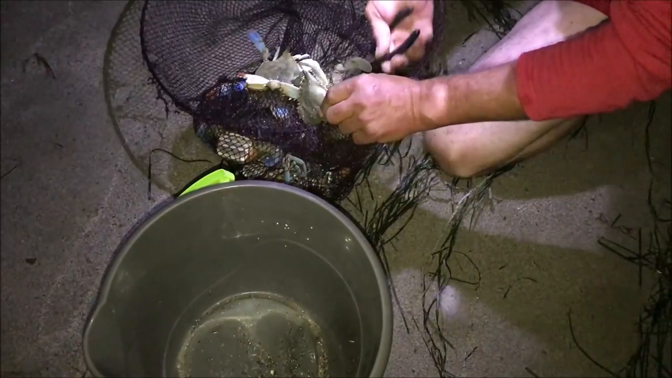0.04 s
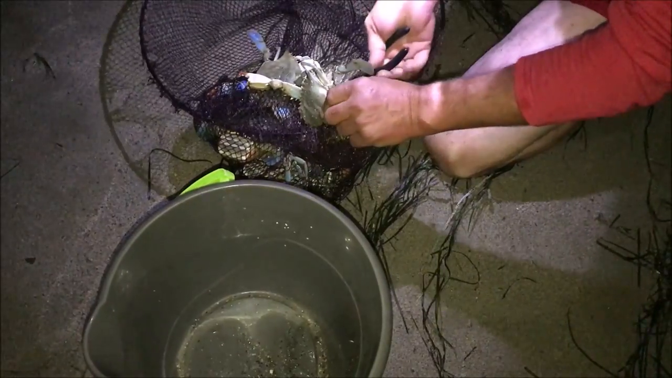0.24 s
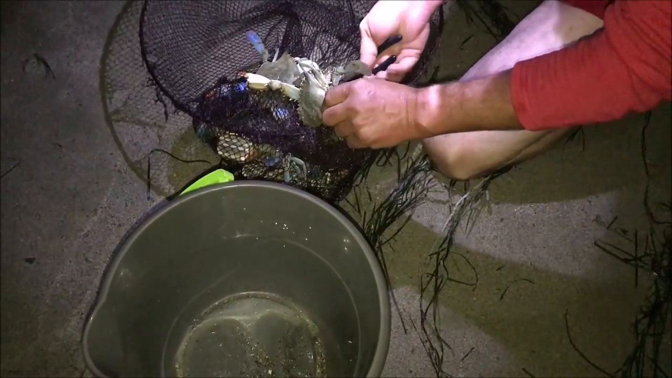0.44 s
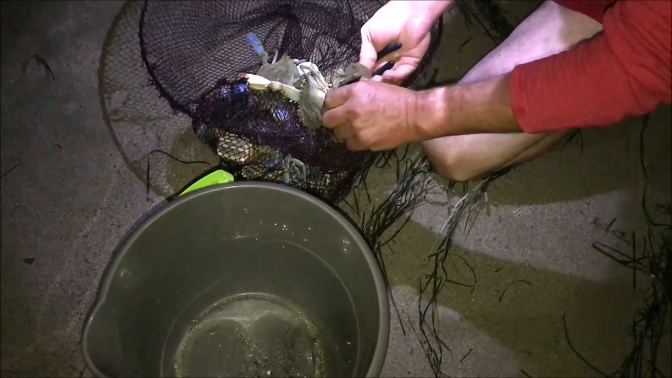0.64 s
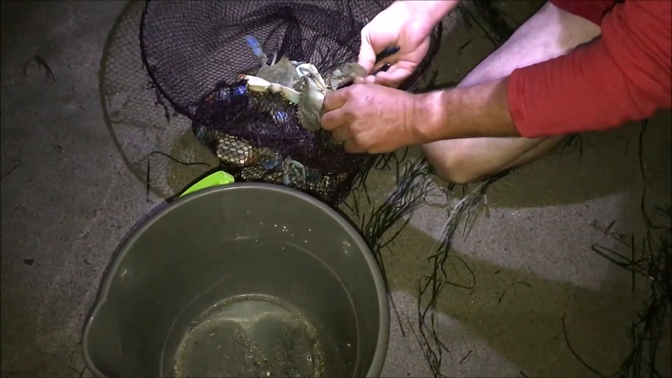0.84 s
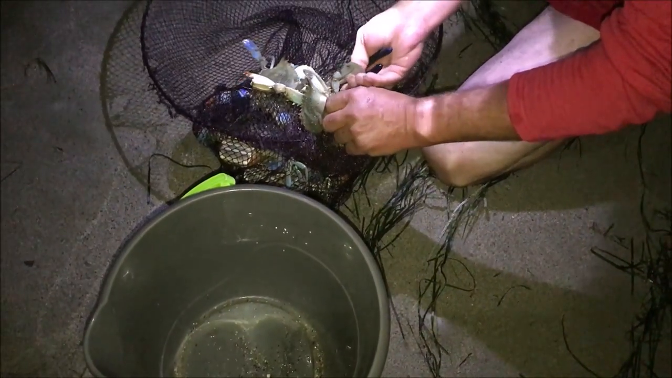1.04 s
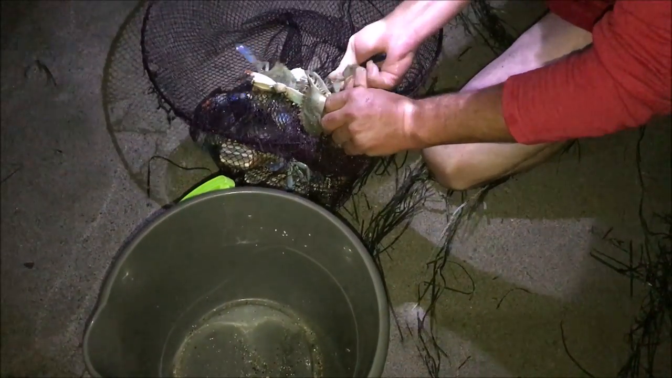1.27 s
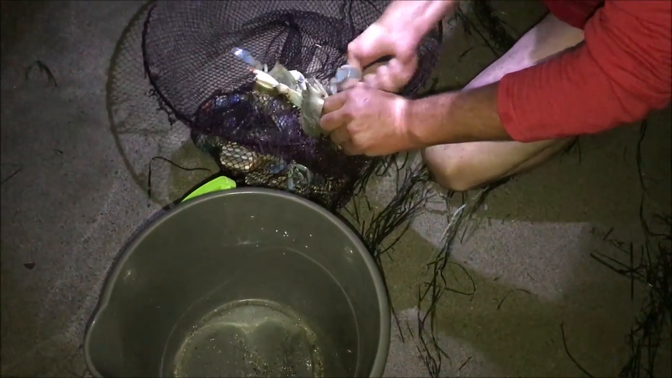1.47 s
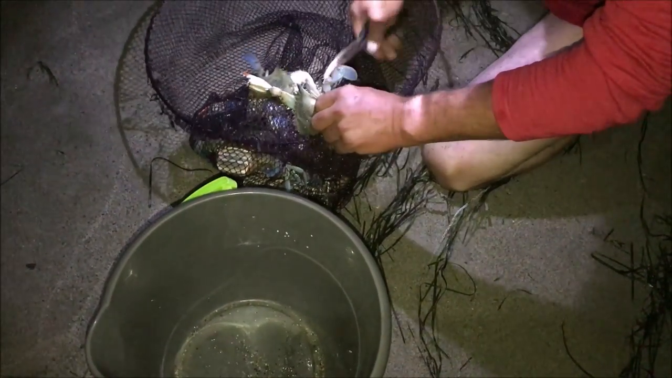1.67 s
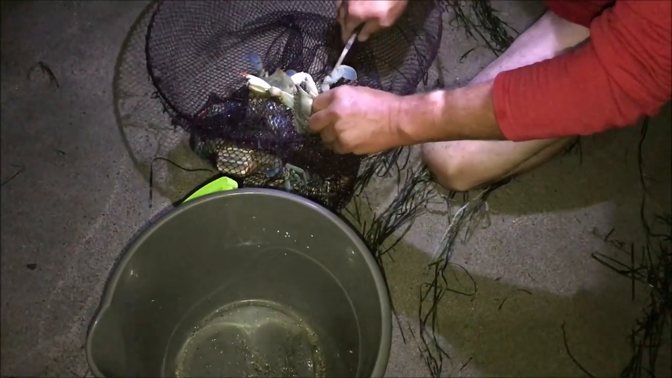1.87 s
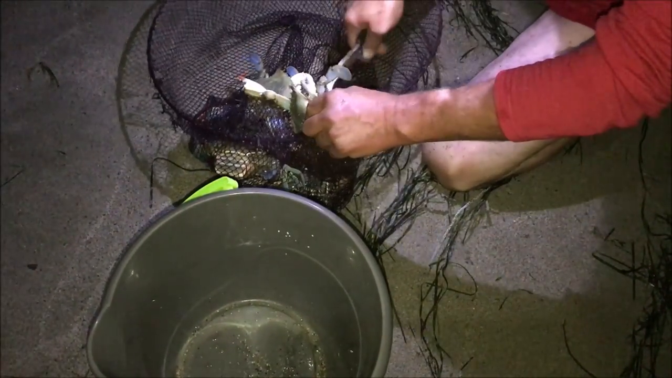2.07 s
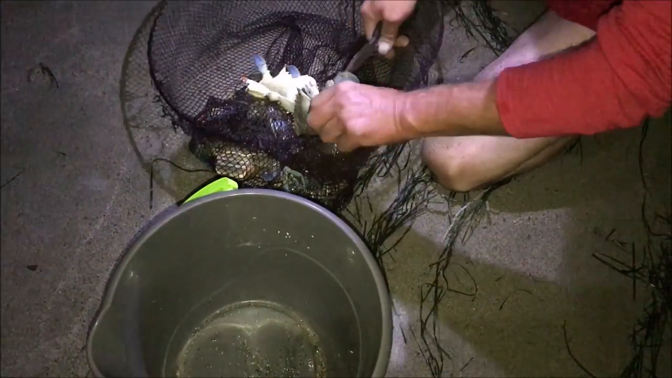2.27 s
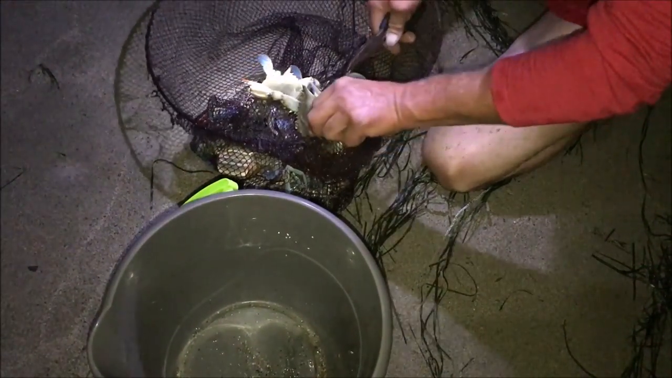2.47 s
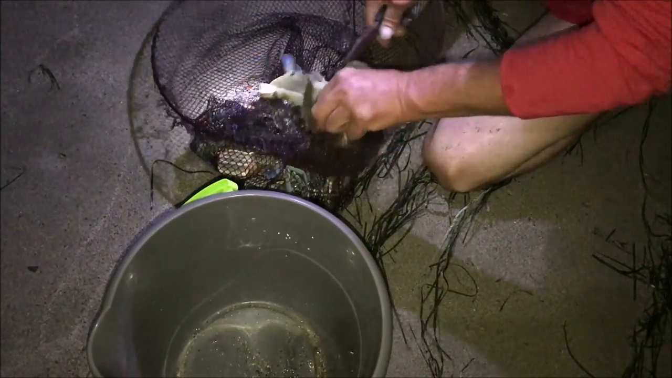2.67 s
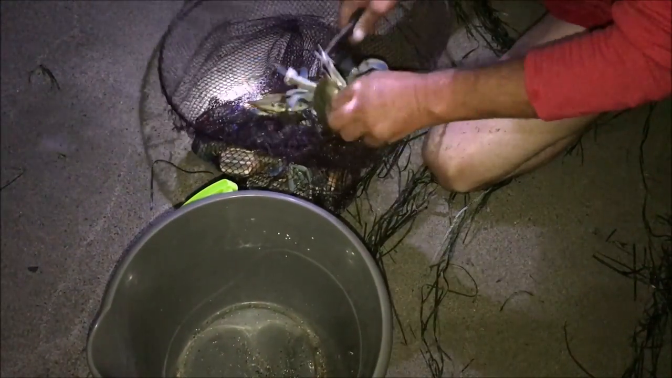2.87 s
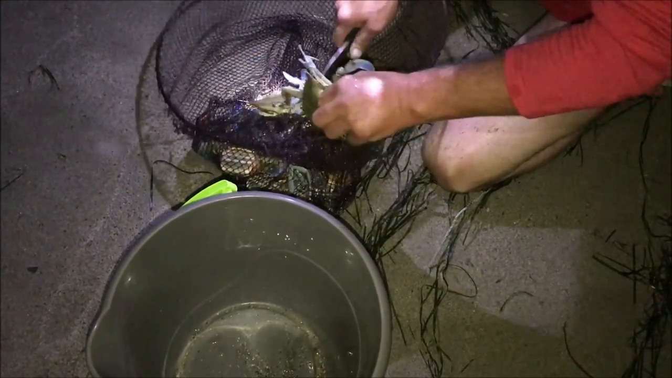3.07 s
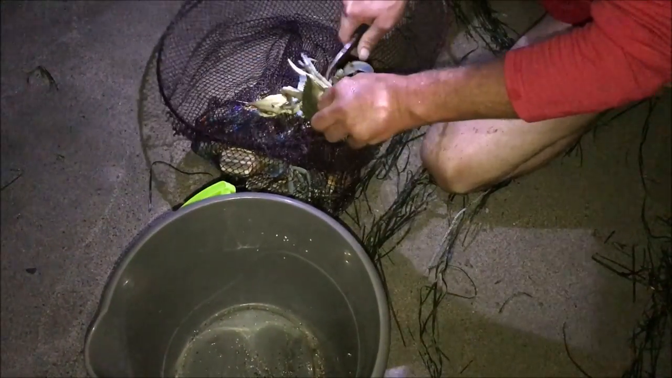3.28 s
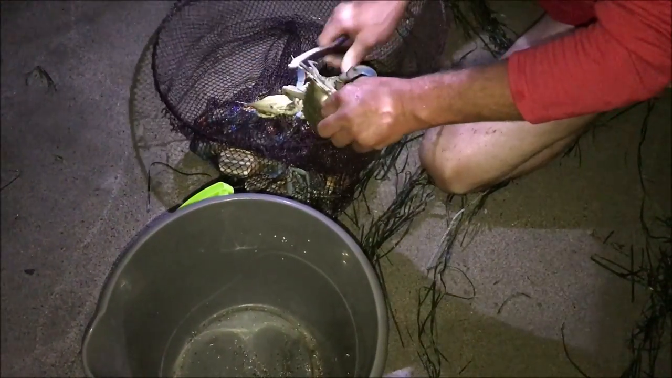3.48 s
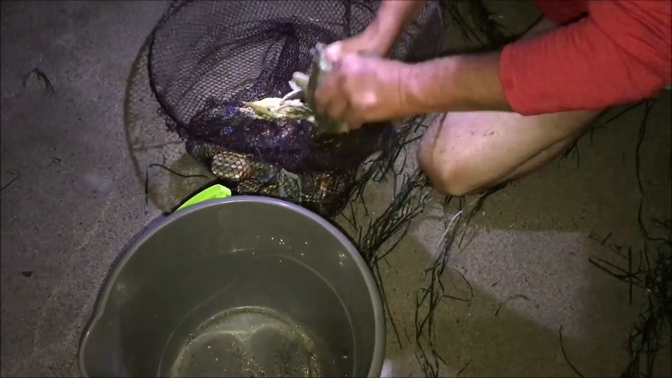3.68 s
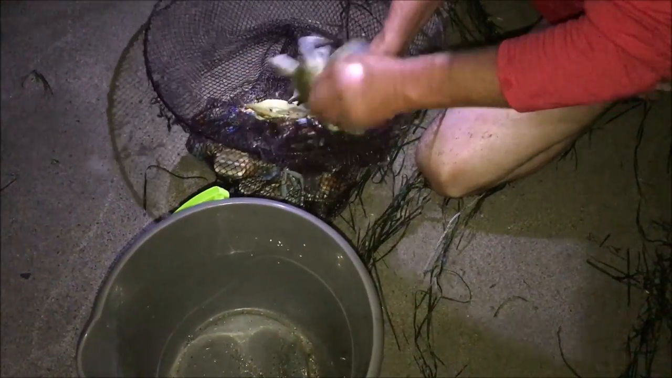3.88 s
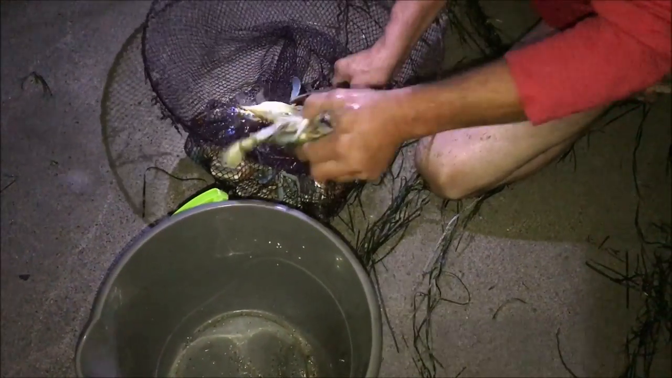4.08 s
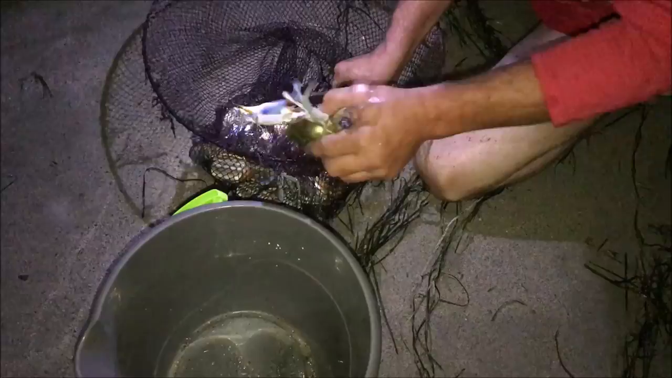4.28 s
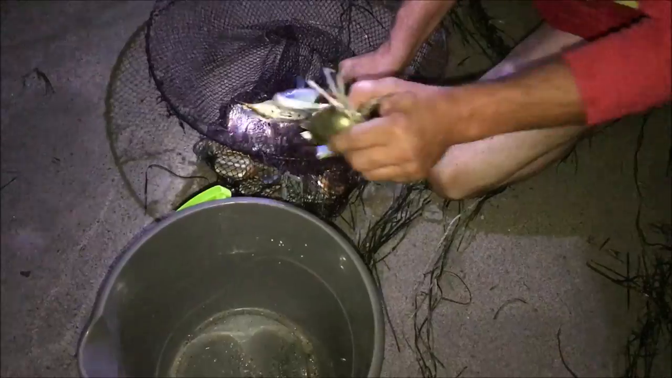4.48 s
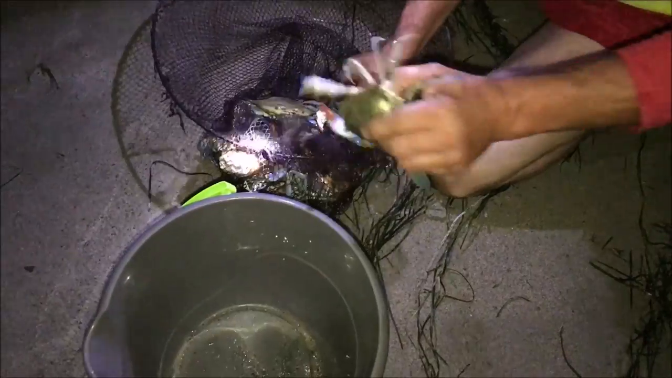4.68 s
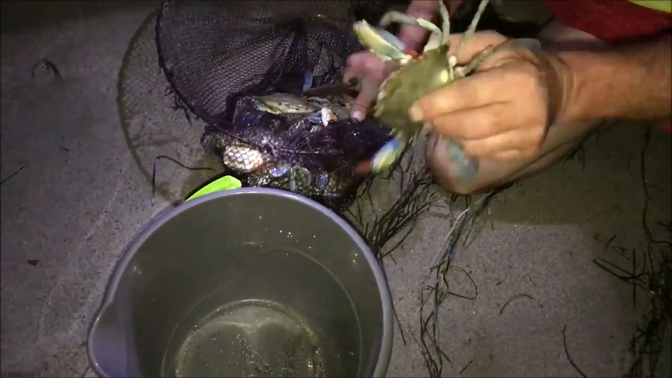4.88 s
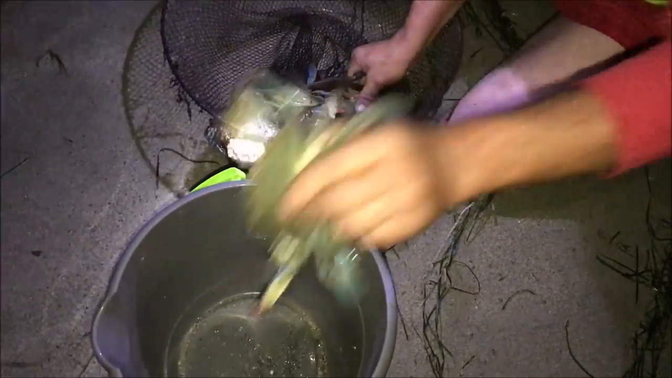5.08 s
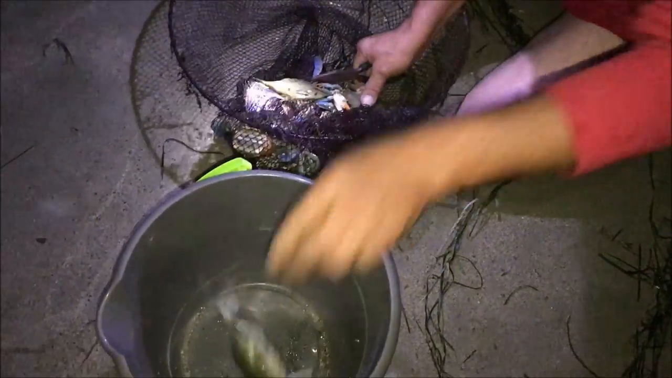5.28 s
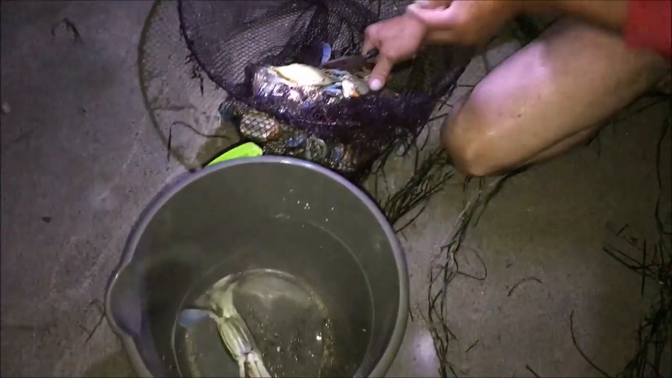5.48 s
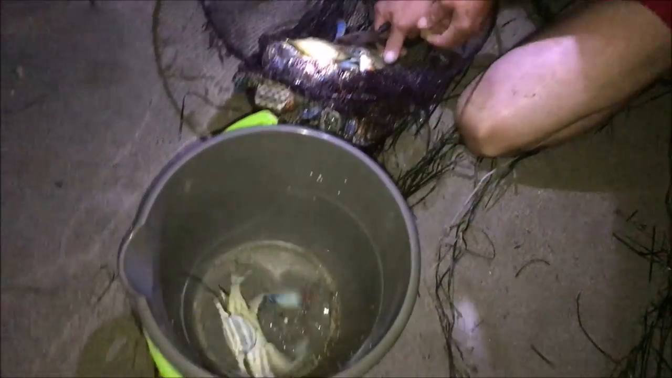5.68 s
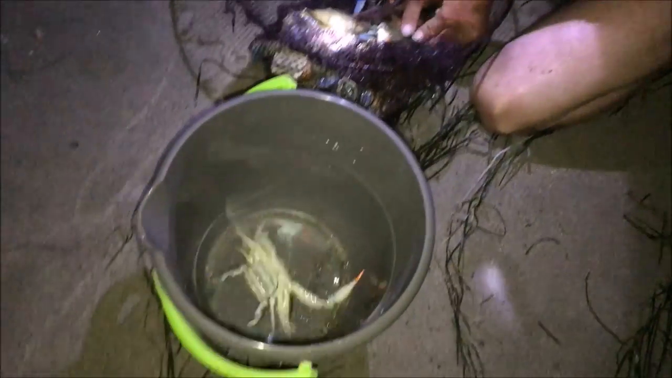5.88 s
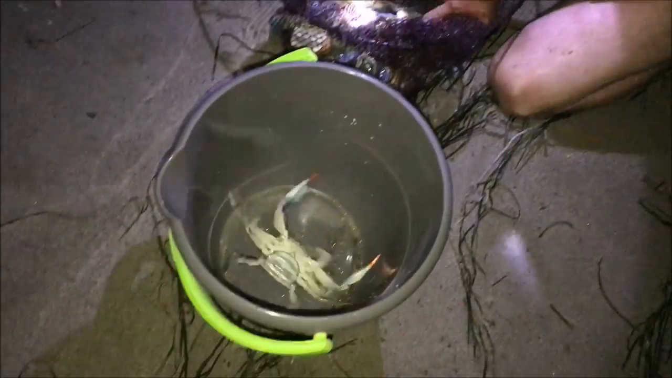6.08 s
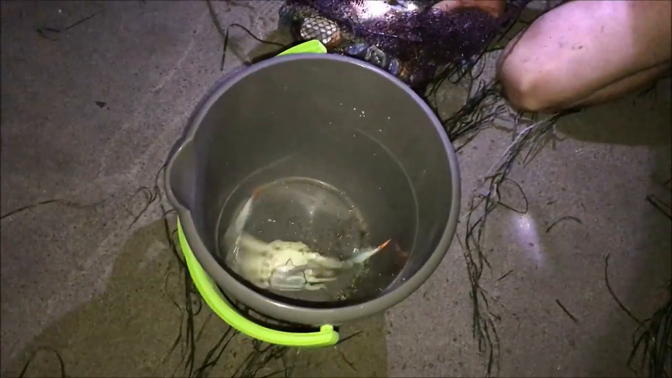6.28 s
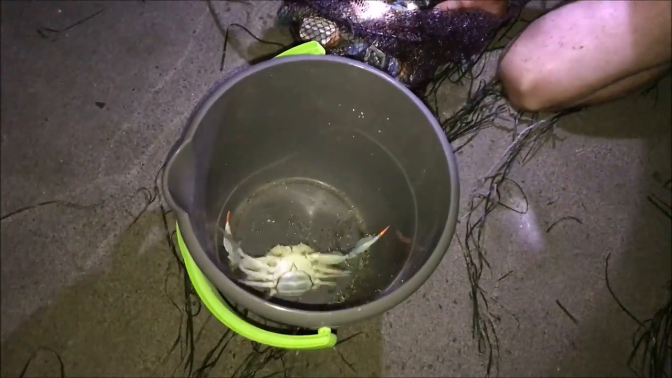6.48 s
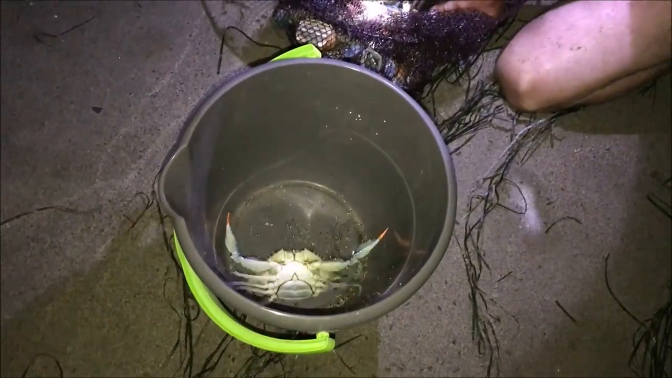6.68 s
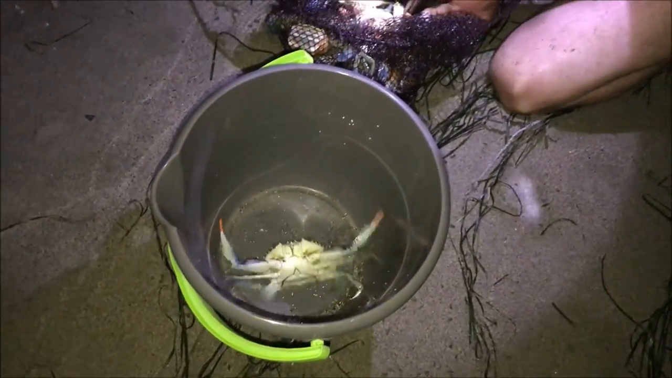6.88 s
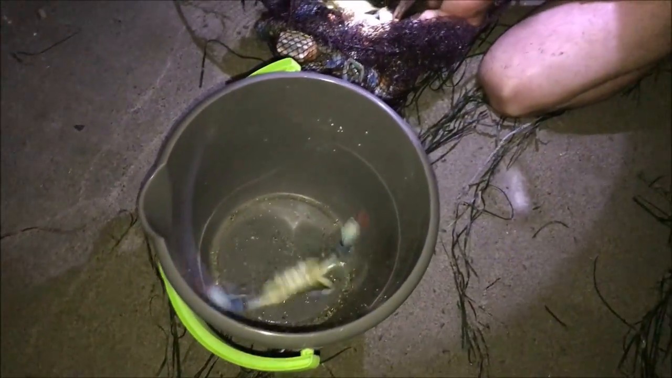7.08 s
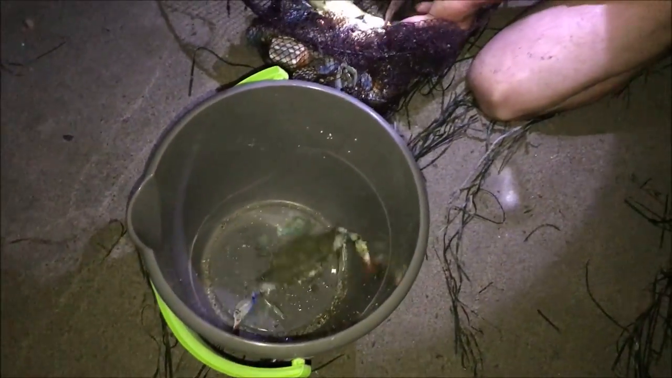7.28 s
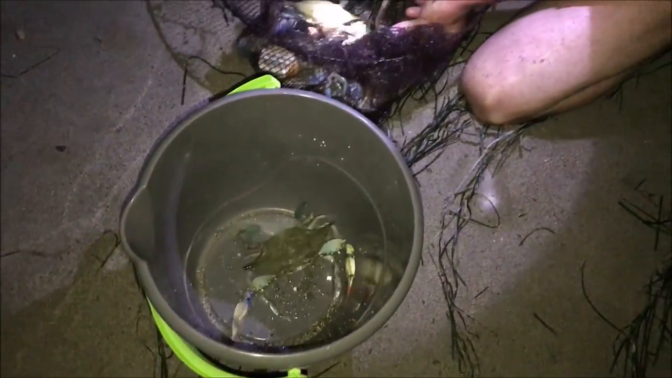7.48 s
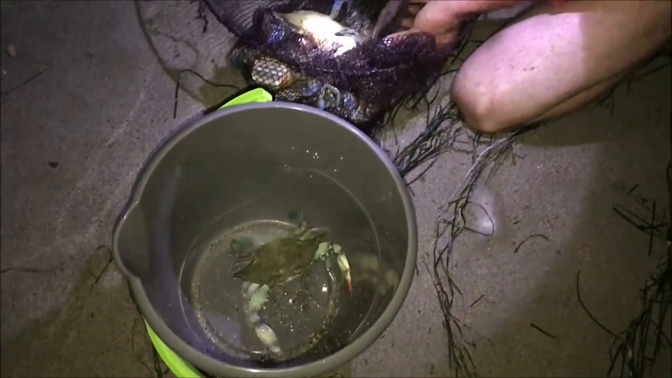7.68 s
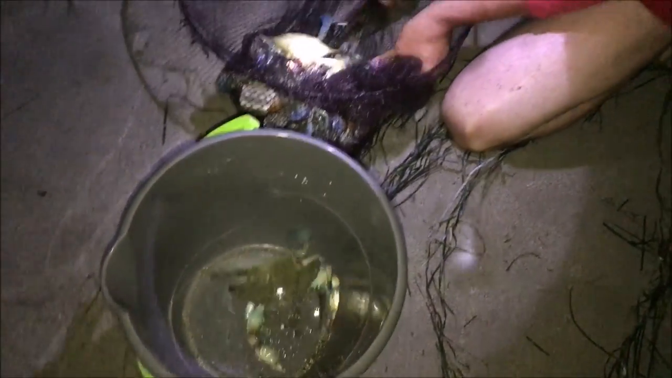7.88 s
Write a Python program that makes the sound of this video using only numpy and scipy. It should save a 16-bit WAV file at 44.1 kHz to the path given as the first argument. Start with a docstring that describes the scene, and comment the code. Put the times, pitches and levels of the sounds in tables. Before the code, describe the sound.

Small waves wash and gurgle at a night shore, two sharp snaps crack out, and a crab drops clattering into a plastic bucket and scrabbles.

```python
"""Crab in a bucket, night shore

Small waves run up and drain: noise and bubbles, with fizz, gurgles and low air gulps.
Behind them: filtered-noise far sea and wind, a far engine as three low gliding sine stretches, a thin hiss.
Sharp snaps and faint ticks, first as hands free the crab from a net, later in the bucket: short rings,
thumps and bright noise cracks.
In the plastic bucket legs and claws knock and scrabble: noisy contacts and slips ring decaying modes.
"""
import sys
import numpy as np
from scipy import signal
from scipy.fft import rfft, irfft
from scipy.io import wavfile
from scipy.ndimage import uniform_filter1d

SR = 44100
rng = np.random.default_rng(int(sys.argv[2]) if len(sys.argv) > 2 else 0)


def to_wav(sig):
    """Store sig (one row per channel, or 1-D mono) as 16-bit WAV at the path in sys.argv[1].

    Samples outside -1..1 are clipped; the rate is SR.
    """
    pcm = np.clip(np.atleast_2d(sig), -1, 1) * 32767
    pcm = np.round(pcm).astype(np.int16)
    wavfile.write(sys.argv[1], SR, pcm.T)  # frames by channels


N = 350151

# Far sea spectrum. Each row: frequency in Hz, relative density in dB per Hz.
SEA_SPECTRUM = [(53, -19), (90, -1.5), (146, -5), (282, -14.5), (480, -10), (600, -1.5), (700, -2.5),
                (822, -17), (1200, -7), (2090, -11.5), (3000, -35), (5500, -90)]
SEA_DB = -59.5
# Wind spectrum. Each row: frequency in Hz, relative density in dB per Hz.
WIND_SPECTRUM = [(15, -30), (30, -9), (55, 6), (80, -1), (130, -31), (300, -70)]
# Gusts over the breeze. Each row: middle in seconds, peak in dB, length (two standard deviations) in seconds.
GUSTS = [(0.0, -58, .15), (.55, -66, .15), (1.12, -61, .05), (2.1, -63, .2), (2.35, -59, 0.055),
         (4.4, -56, .06), (4.9, -65, .06), (5.25, -65, .1)]
BREEZE_DB = -69
# Far engine, one list per stretch. Each row: time in seconds, pitch in Hz, level in dB.
ENGINE_STRETCHES = [
    [(0, 99.3, -65.5), (.8, 102.4, -62.5), (.92, 102, -81)],
    [(1.15, 97, -80), (1.45, 109.5, -65.5), (1.7, 122.7, -67.5), (2.15, 127, -78)],
    [(1.9, 92, -82), (2.25, 99, -69), (2.5, 102.5, -71), (2.8, 100, -62), (3.1, 94, -78)],
]
# High hiss, perhaps an insect. Each row: time in seconds, centre in Hz, level in dB.
HISS = [(2.25, 14100, -82.5), (2.4, 14200, -62), (2.65, 14200, -60), (2.9, 14600, -62), (3.05, 14700, -80)]

# Waves. Each row: time in seconds, wash level in dB, foam fizz level in dB, gurgle level in dB,
# pitch of the hollow in Hz.
WAVES = [(0.0, -49, -52.5, -61.5, 260), (0.55, -51.5, -54, -60.5, 250), (1.07, -58.5, -55.5, -63, 225),
         (1.5, -59.5, -55, -68, 316), (1.72, -55, -56, -61, 230), (2.29, -61, -61.5, -65.5, 252),
         (2.46, -55, -54, -63, 340), (2.64, -45.5, -54, -53.5, 300), (2.92, -43.5, -53, -43.5, 357),
         (3.2, -43.5, -55, -57, 403), (3.61, -38, -50, -51.5, 360), (3.85, -40, -51, -50, 342),
         (4.13, -38, -44.5, -52.5, 246), (4.45, -41, -51.5, -50, 260), (4.83, -46, -51, -56, 226),
         (5.35, -48, -54, -52.5, 240), (5.6, -57.5, -47.5, -70, 250), (6.7, -57.5, -61.5, -66, 255),
         (7.3, -46, -53, -53, 250), (7.65, -53, -58.5, -59, 261), (7.94, -39.5, -49, -50, 254)]
# Wash spectrum. Each row: frequency in Hz, relative density in dB per Hz.
WASH_SPECTRUM = [(250, -37), (420, -8), (540, -8), (650, -1.5), (820, -3), (1100, 0), (1700, -2.5),
                 (3500, -6.5), (5000, -10), (9000, -16.5), (16000, -40)]
# Foam fizz spectrum. Each row: frequency in Hz, relative density in dB per Hz.
FIZZ_SPECTRUM = [(880, -55), (1500, -10), (2210, -30), (2390, -9), (2610, -15), (3030, -3), (3960, -9),
                 (5600, -5), (7460, -6.5), (14300, -6), (16000, -6.5)]
# Air trapped under a wave. Each row: start in seconds, peak in dB, pitch in Hz, t60 in seconds.
GULPS = [(2.622, -42, 346, 0.081), (4.09, -36, 223, 0.095), (4.3, -38, 289, 0.054),
         (5.155, -37, 168.5, 0.12)]

# Snaps and faint ticks, at the net and later in the bucket. Each row: start in seconds, ring peak in dB,
# pitch in Hz, thump in dB re ring, crack in dB re ring, t60 in seconds.
SNAPS = [(0.0254, -44, 3000, -24, 25, 0.018), (0.0467, -42, 1940, -5, 10, 0.015),
         (1.473, -36, 3000, -30, 11, .01), (1.477, -2.5, 2980, -45, 0.5, 0.0098),
         (1.4778, -5, 2220, -14.5, -23, 0.0085), (1.4822, -25, 2930, -16, 2, .015),
         (1.489, -35, 1570, -15, -7, 0.017), (1.5, -38, 2260, -18, 8, 0.02),
         (1.5872, -30, 2280, -31, -10, 0.013), (1.688, -44.5, 1390, -21, 9, 0.015),
         (1.791, -27.5, 2250, -34, 4.5, 0.019), (1.7988, -41, 1890, -17, 12.5, 0.019),
         (1.89, -33, 1630, -30, -11, 0.0061), (2.29, -45, 2600, -20, 0, .012),
         (2.35, -45.5, 2940, -4, 10.5, 0.013), (2.428, -38.5, 1480, -27, 0, 0.023),
         (2.489, -38.5, 1850, -5, -13, 0.015), (3.1742, -34, 1530, -29, -19, 0.015),
         (4.8716, -31.5, 1860, -40, -19, 0.015), (4.9947, -35.5, 1990, -31, 9, 0.015),
         (7.5139, -3, 2495, -58, 1, 0.015), (7.5152, -21.5, 2400, -16, 16.5, 0.013),
         (7.788, -13, 3120, -30, -12, 0.0051)]
# Modes of a snap's ring. Each row: factor on the snap's pitch, level in dB.
SNAP_MODES = [(0.958, 27), (4.1, -24), (0.656, -22), (5.2, -28)]

# Bucket floor and air column. Each row: frequency in Hz, level in dB, t60 in seconds.
BOTTOM_MODES = [(67, -26, .09), (107, -22, 0.21), (189, -13, 0.17), (257, 4.5, 0.041), (310, 9.5, 0.052),
                (420, -9, 0.024)]
# Bucket wall. Each row: frequency in Hz, level in dB, t60 in seconds.
WALL_MODES = [(677, -19.5, 0.054), (767, -13.5, 0.029), (904, -8.5, 0.059), (1025, -10.5, 0.058),
              (1145, 3.5, 0.022), (1410, 2, 0.013), (1650, 4, 0.015), (1796, -3.5, 0.034), (2227, 9, 0.006),
              (2720, 3, 0.01), (3360, -4.5, 0.014), (3550, -28, 0.0092), (4060, 2, 0.006),
              (4500, -12, 0.0085)]
# Hard claw tip. Each row: frequency in Hz, level in dB, t60 in seconds (ring() floors it at 0.003).
CLAW_MODES = [(2480, -6, 0.0057), (3070, 0, 0.0029), (3970, -3, 0.002), (5600, -9.5, 0.0017)]
# Bright edge of a hard contact. Each row: frequency in Hz, relative density in dB per Hz.
TICK_SPECTRUM = [(1470, -82), (2500, -22), (3230, -3), (4020, -1.5), (5190, -3), (7770, -4.5), (8330, -1),
                 (9360, -6), (13100, -5), (16000, -11.5)]
# Struggling, legs dragging on plastic. Each row: start in seconds, length in seconds, wall scrape in dB,
# push on the bottom in dB, grit in dB.
BOUTS = [(5.407, 0.086, -39, -42, -43), (5.674, 0.12, -43, -51, -48.5), (5.801, 0.089, -38, -40, -43),
         (5.89, 0.081, -40.5, -43.5, -45.5), (5.977, .2, -48, -58, -58), (6.183, .16, -43.5, -48.5, -48),
         (6.352, 0.21, -41.5, -44.5, -47.5), (6.57, 0.5, -50.5, -55, -58), (7.036, 0.12, -47, -52, -51),
         (7.173, 0.12, -40, -51, -50.5), (7.31, 0.1, -45.5, -49.5, -57), (7.44, 0.11, -41.5, -53, -44.5),
         (7.578, 0.18, -47, -58.5, -58), (7.752, .25, -43.5, -54, -48)]
DRAG_EASE_S = 0.035
# Clear knocks on the bucket. Each row: start in seconds, wall peak in dB, thud, claw and tick each in dB
# re wall, wall spot in Hz, contact decay constant in ms.
KNOCKS = [(5.393, -13.5, -36, -32, -7.5, 1070, 4.4), (5.408, -16, -3, -4, -17, 1090, 2.8),
          (5.42, -8, -13.5, -14, -4.5, 1760, 3.7), (5.425, -15.5, -9, -15, 3, 1080, 1.5),
          (5.436, -0.5, -7.5, -29, -4.5, 766, 4.4), (5.443, -21, -10, -3, -13, 680, 4.7),
          (5.451, -7.5, -5, 0, -0.5, 1130, 4.1), (5.472, -17, -14, -10, -20, 996, 2.8),
          (5.479, -24, -14, -15, -11, 1140, 1.3), (5.495, -26, -21, -17, -16, 1100, 1.6),
          (5.507, -20.5, -16, -6, -18, 1130, 3.1), (5.638, -20.5, -8, -1, -28, 1090, 1.2),
          (5.652, -23.5, -5, -13, -24, 1110, 2.4), (5.686, -46, -7, -14, -11, 1760, 1.3),
          (5.71, -33, -23, -10, -18, 1150, 3), (5.729, -23, -17, -13, -18, 880, 1.1),
          (5.744, -30, -2.5, -13, -11, 1070, 1.8), (5.773, -30, -7, -4, -3, 1600, 2.2),
          (5.808, -21.5, -13, -11, -16, 856, 3.5), (5.823, -16, -5.5, -11, -24, 1080, 1.1),
          (5.835, -21, 2, -18, -23, 969, 6), (5.843, -7, -17, -23, -36, 1060, 1.8),
          (5.851, -15, -27, -10, -27, 1110, 3.5), (5.865, -15, -12, -25, -25, 1260, 6.4),
          (5.875, -14.5, -4, -8, -26, 1000, 3.2), (5.91, -23.5, -5, -14, 4.5, 1170, 3.2),
          (5.922, -29, -7, -3, -22, 1150, 1.9), (5.949, -23.5, -9, -4, -19, 840, 2.9),
          (5.996, -25.5, -27, -4, -22, 2460, 2.8), (6.015, -13.5, -6, -12, -37, 880, 3.4),
          (6.044, -30, -23, -10, -7, 1100, 3.3), (6.067, -15, -38, -8, -32, 1730, 2.4),
          (6.075, -27.5, -23, 5.5, -24, 1300, 2.3), (6.099, -36, 5, -13, -22, 1170, 1.6),
          (6.112, -14.5, -15, -19, -24, 1190, 1.1), (6.165, -33.5, -29, 7.5, -14, 1130, 1.4),
          (6.183, -33, -22, -3, -2, 1570, 2.1), (6.212, -22, -12, -1, -1, 1310, 4.3),
          (6.237, -30, -22, -12, -23, 1110, 2.1), (6.249, -15.5, -36, -17, -32, 1090, 0.8),
          (6.258, -19, -29, -17, -26, 1100, 2.7), (6.264, -23, -9, -12, -4, 856, 1.7),
          (6.283, -25.5, -13, -7, 5, 818, 0.96), (6.298, -16, -17, -14, -21, 1110, 1.6),
          (6.31, -27, -10, -8, -15, 1100, 2.5), (6.33, -29, -23, -10, -13, 1870, 2.1),
          (6.345, -34, -25, 11, -9, 1050, 0.93), (6.359, -23.5, -4, 6, -29, 860, 8.8),
          (6.397, -23.5, -19, -5, -19, 1590, 1.9), (6.413, -20, -21, -12, -16, 1220, 2.4),
          (6.42, -15.5, -8.5, -4.5, -36, 2110, 5), (6.431, -19.5, -13, -14, -25, 2050, 1.2),
          (6.474, -24.5, -21, -3.5, -11, 1650, 2.1), (6.488, -29.5, -20, -12, -7, 840, 3.8),
          (6.519, -31.5, 0.5, -17, -15, 646, 1.8), (6.542, -24.5, -15, 0, -30, 1880, 1),
          (6.552, -19.5, -35, -17, -31, 1800, 3), (6.567, -31, -22, -6, -13, 1960, 1.5),
          (6.594, -34.5, -24, 3, -16, 1150, 2.1), (6.646, -32.5, -21, 0, -2, 1080, 2.3),
          (6.701, -32, -9, -19, -20, 1180, 2.3), (6.722, -24.5, -38, -31, -28, 1210, 2.8),
          (6.747, -23, -32, -29, -26, 1820, 1.8), (6.771, -35, -13, -16, -20, 670, 2.2),
          (6.838, -20.5, -30, -3, -9, 1480, 1.8), (6.86, -32, -18, 0, 2, 1290, 1.7),
          (6.871, -25, -20, 0, 2.5, 1490, 1.5), (6.879, -24, -31, 1, -12, 1310, 3.1),
          (6.893, -26.5, -34, 0, -17, 1570, 2.2), (6.925, -28.5, -25, -9, -17, 676, 3),
          (7.071, -30, -22, -11, -3, 1020, 2.1), (7.085, -32, -12, -2, 6.5, 999, 2.2),
          (7.093, -24, -15, 0, -20, 1110, 3.5), (7.106, -16, -13.5, -1, -29, 1120, 1.8),
          (7.116, -35, 3, -7, -6, 1390, 2.1), (7.132, -40, -18, 1, 16, 1120, 1.1),
          (7.141, -16.5, -35, 5.5, -33, 1190, 3.4), (7.172, -36, 4.5, -11, -16, 1030, 1.8),
          (7.193, -26, -21, -9, -15, 1590, 3.4), (7.209, -26, -20, 5, -19, 1110, 1.8),
          (7.221, -28, -26, -5, -8, 1810, 1.2), (7.225, -36, -20, -5, 9, 1810, 1.2),
          (7.23, -9.5, -43, -19, -3, 1850, 1.5), (7.252, -21.5, -33, 6, -26, 1920, 2.2),
          (7.268, -23, -7.5, -2, 2, 1150, 1.3), (7.272, -12.5, -34, -4, 3, 1200, .81),
          (7.287, -35, -16, -13, 7, 1260, 1.2), (7.333, -27.5, -12, 0, -20, 1640, 2.4),
          (7.346, -25, -26, -18, 0, 1140, 3.5), (7.381, -27, -5.5, -24, 5.5, 1190, 2.5),
          (7.464, -19.5, -38, -3, -21, 1210, 1.9), (7.492, -19.5, -35, -6, -4, 2410, 1.1),
          (7.535, -24, -24, -9, -6, 1140, 1.8), (7.542, -26.5, -26, -16, -28, 1690, 1.8),
          (7.575, -23, -39, -17, -29, 1140, 2.6), (7.627, -37, -18, -2, -19, 1570, 2.2),
          (7.679, -26, -7, -19, -19, 1540, 1.6), (7.744, -28, -12, -3, -12, 1430, 1.1),
          (7.817, -25, -35, -6, -1.5, 1640, 6), (7.826, -25, -25, -4, -8, 2380, 1.8),
          (7.855, -24, -25, -10, -16, 960, 3.6), (7.884, -24.5, -26, -24, -19, 859, 4.4)]
BOTTOM_SPOT_HZ, BOTTOM_SPOT_SPREAD_OCT = 257, .12  # spot of a 0 dB thud, its random spread
SPOT_RISE_OCT_PER_DB = 1.3  # spot frequency rises with thud level
JOLT_HZ, JOLT_RE_THUD_DB = 150, -16.5  # whole bucket jolting on the sand

EDGE_HZ = 15900  # upper band limit


def gain_of(db):
    """Amplitude factor of a level in dB."""
    return 10 ** (np.asarray(db) / 20)


def evened(x):
    """Scales to unit RMS."""
    return x / np.sqrt(np.mean(x ** 2) + 1e-20)


def peaked(x):
    """Scales to unit peak."""
    return x / (abs(x).max() + 1e-20)


def read(points, hz):
    """Interpolates a spectrum table over log frequency."""
    f, value = np.transpose(points)
    return np.interp(np.log(hz + 1), np.log(f + 1), value)


def curves(rows):
    """Interpolates each column over time, one value per sample."""
    s, *columns = np.transpose(rows)
    return [np.interp(np.arange(N) / SR, s, c) for c in columns]


def add(mix, s, sound):
    """Adds a sound into the mix at s seconds, cut at the end."""
    part = mix[max(round(s * SR), 0):][:len(sound)]
    part += sound[:len(part)]


def coloured(x, spectrum):
    """Filters by a spectrum table, to unit RMS."""
    gain = gain_of(read(spectrum, np.fft.rfftfreq(len(x), 1 / SR)))
    return evened(irfft(rfft(x) * gain, len(x)))


def high_pass(x, hz, order=2):
    """Butterworth high-pass."""
    return signal.sosfilt(signal.butter(order, hz, "high", fs=SR, output="sos"), x)


def resonate(x, hz, width_hz):
    """Moving resonance: shifts the curve hz down to zero, smooths, shifts back."""
    turn = np.exp(2j * np.pi * np.cumsum(hz) / SR)
    r = np.exp(-np.pi * width_hz / SR)
    return 2 * (turn * signal.lfilter([1 - r], [1, -r], x / turn)).real


def patchy_noise(patchy_db, flicker_db, size=512):
    """White noise whose level wanders in small patches and flickers across all pitches."""
    frames, bins = 4 * N // size + 8, size // 2 + 1
    a, b, patches = rng.standard_normal((frames, bins, 3)).T
    # transposed: axis 0 is frequency, axis 1 is time
    patches = evened(uniform_filter1d(uniform_filter1d(patches, 6, axis=0), 16, axis=1))
    flicker = evened(uniform_filter1d(rng.standard_normal(frames), 5))
    z = (a + 1j * b) * gain_of(patchy_db * patches + flicker_db * flicker)
    noise = signal.istft(z, nperseg=size, noverlap=3 * size // 4)[1]
    return evened(noise[:N])


def sparks(per_s, spread_db):
    """Random clicks of either sign, a few of them large."""
    size = gain_of(spread_db * np.minimum(rng.exponential(1, N), 5))
    sign = rng.choice([-1, 1], N)
    return size * sign * (rng.random(N) < per_s / SR)


def bubbles(lo_hz, hi_hz, per_s, cycles, spread_db, count=16):
    """Short rising pings of many sizes, each size with its own random train."""
    out = np.zeros(N)
    for hz in np.geomspace(lo_hz, hi_hz, count):
        turns = np.arange(int(4 * cycles * SR / hz)) * hz / SR
        envelope = np.exp(-turns / cycles) * (1 - np.exp(-2 * turns))
        ping = np.sin(2 * np.pi * turns * (1 + 0.0056 * turns)) * envelope
        out += signal.oaconvolve(sparks(per_s / count, spread_db), ping * np.sqrt(hz))[:N]
    return evened(out)


def ring(modes, length=4000):
    """One dying sine per mode, shape (modes, samples)."""
    hz, db, t60 = np.transpose(modes)[:, :, None]
    t = np.arange(length) / SR
    return gain_of(db - 60 * t / np.maximum(t60, .003)) * np.sin(2 * np.pi * hz * t)


def tick(noise, t60):
    """Bright contact noise: a fast decay plus a slower one."""
    t = np.arange(len(noise)) / SR
    decay = gain_of(-60 * t / (0.27 * t60)) + 0.95 * gain_of(-60 * t / t60)
    return peaked(coloured(noise, TICK_SPECTRUM) * decay)


def far_sea():
    """Far roar: patchy noise shaped to a mostly low spectrum."""
    return gain_of(SEA_DB) * coloured(patchy_noise(2.2, 1.4, size=2048), SEA_SPECTRUM)


def wind():
    """Low noise: steady breeze plus bell-shaped gusts."""
    s = np.arange(N) / SR
    level = np.full(N, gain_of(BREEZE_DB))
    for middle_s, db, length_s in GUSTS:
        level += gain_of(db) * np.exp(-.5 * ((s - middle_s) / length_s * 2) ** 2)
    return level * coloured(patchy_noise(2.0, 1.5, size=2048), WIND_SPECTRUM)


def engine():
    """Far engine: three low sine stretches of gliding pitch and level, two overlapping briefly."""
    out, s = np.zeros(N), np.arange(N) / SR
    for stretch in ENGINE_STRETCHES:
        hz, db = curves(stretch)
        running = (s >= stretch[0][0]) & (s < stretch[-1][0])
        tone = np.sin(2 * np.pi * np.cumsum(hz) / SR)
        out += running * np.sqrt(2) * gain_of(db) * tone  # sqrt(2): levels are RMS
    return out


def hiss():
    """Thin high hiss: white noise through two equal moving resonances."""
    hz, db = curves(HISS)
    noise = resonate(rng.standard_normal(N), hz, 1300)
    return gain_of(db) * evened(resonate(noise, hz, 1300))


def waves():
    """A wash of noise and bubbles, the fizz of bursting foam, and low gurgles in the hollows."""
    wash_db, fizz_db, gurgle_db, hollow_hz = curves(WAVES)
    wash = patchy_noise(2.07, 1.0) + 0.27 * bubbles(469, 5740, 3000, 2.04, 3.7)
    wash = coloured(wash, WASH_SPECTRUM)
    fizz = patchy_noise(1.7, 1.0) + .42 * bubbles(2500, 14000, 1000, 2.0, 5.0)
    fizz = coloured(fizz, FIZZ_SPECTRUM)
    gurgle = patchy_noise(2.2, 1.5) + 0.25 * bubbles(147.4, 498, 90, 4.0, 1.7, count=10)
    gurgle = evened(resonate(resonate(gurgle, hollow_hz, 224), hollow_hz, 235))
    return gain_of(wash_db) * wash + gain_of(fizz_db) * fizz + gain_of(gurgle_db) * gurgle


def gulps():
    """A pocket of air collapses with a soft start and a low two-mode ring."""
    out = np.zeros(N)
    soft_start = 1 - np.exp(-np.arange(6000) / SR / 0.011)
    for s, db, hz, t60 in GULPS:
        pocket = ring([(hz, 0, t60), (1.4 * hz, -6, t60)], length=6000).sum(0)
        add(out, s, gain_of(db) * peaked(high_pass(pocket, 100) * soft_start))
    return out


def snaps():
    """A short rough ring at the snap's pitch, a thump, a noise crack, and a fainter repeat 5 ms later."""
    out, t = np.zeros(N), np.arange(60) / SR
    chance = rng.standard_normal((len(SNAPS), 1200))
    thump = high_pass(ring([(360, 0, 0.023)], length=1200)[0], 207, order=3)
    for (s, db, hz, thump_db, crack_db, t60), noise in zip(SNAPS, chance):
        modes = [(hz * k, mode_db, t60) for k, mode_db in SNAP_MODES]
        ragged_break = (1 + 0.17 * noise[-60:]) * np.exp(-t / 0.000096)
        rough_ring = np.convolve(ring(modes, length=1200).sum(0), ragged_break)[:1200]
        sound = peaked(high_pass(rough_ring, 850))
        sound = sound + gain_of(thump_db) * thump + gain_of(crack_db) * tick(noise, t60)
        add(out, s, gain_of(db) * sound)
        add(out, s + 0.005, gain_of(db - 21) * high_pass(sound, 497))
    return out


def bouts(levels_db):
    """Level of the drag: each bout eases in, holds and eases out; powers add."""
    t, power = np.arange(N) / SR, np.zeros(N)
    for (start_s, length_s, *_), db in zip(BOUTS, levels_db):
        inside_s = np.minimum(t - start_s, start_s + length_s - t)
        hold = np.clip(inside_s / DRAG_EASE_S + .5, 0, 1)
        power += (gain_of(db) * np.sin(np.pi / 2 * hold) ** 2) ** 2
    return np.sqrt(power)


def scrabble():
    """Legs drag and slip: a rough rub and many small slips ring the wall, slips ring the bottom, grit hisses."""
    _, _, scrape_db, push_db, grit_db = np.transpose(BOUTS)
    rub = 0.057 * patchy_noise(6.5, 7.0, size=256)
    wall, bottom = np.zeros(N), np.zeros(N)
    for k, mode in enumerate(ring(WALL_MODES, length=1500)):
        drive = sparks(260, 5.74) + np.roll(rub, 997 * k)  # rolled: modes decorrelate
        wall += signal.oaconvolve(drive, mode)[:N]
    for mode in ring(BOTTOM_MODES):
        bottom += signal.oaconvolve(sparks(110, 2.2), mode)[:N]
    grit = coloured(sparks(1500, 4.2) + .6 * patchy_noise(2.5, 4.0, size=256), TICK_SPECTRUM)
    scrape = bouts(scrape_db) * evened(high_pass(wall, 400))
    push = bouts(push_db) * evened(high_pass(bottom, 92))
    return scrape + push + bouts(grit_db) * grit


def struck(modes, spot_hz, db_per_octave, uneven_db, detune, chance):
    """The modes nearest the struck spot ring loudest; the moving body shifts them a little each time."""
    hz, db, t60 = np.transpose(modes)
    octaves = np.minimum(abs(np.log2(hz / spot_hz)), 1.6)
    level, pitch = chance[:2 * len(hz)].reshape(2, -1)
    db = db - db_per_octave * octaves + uneven_db * level
    return ring(np.transpose([hz * (1 + detune * pitch), db, t60]), length=2900).sum(0)


def knocks():
    """A rough contact drives wall and claw tip, a soft push drives the bottom, and the edge ticks."""
    out, t = np.zeros(N), np.arange(600) / SR
    chance = rng.standard_normal((len(KNOCKS), 1000))
    swing = np.arange(1200) / SR * JOLT_HZ  # in cycles
    jolt = peaked(high_pass(np.sin(2 * np.pi * swing) * swing * np.exp(-swing / .4), 85))
    claw = high_pass(ring(CLAW_MODES, length=400).sum(0), 1600)
    for (s, db, thud_db, claw_db, tick_db, wall_hz, contact_ms), noise in zip(KNOCKS, chance):
        contact_s = np.clip(contact_ms / 1000, .0003, .012)
        press = (1 - np.exp(-t / 0.0004)) * np.exp(-t / contact_s) * noise[:600]
        spot_oct = BOTTOM_SPOT_SPREAD_OCT * noise[700] + SPOT_RISE_OCT_PER_DB * thud_db
        bottom_hz = BOTTOM_SPOT_HZ * 2 ** spot_oct
        wall = high_pass(struck(WALL_MODES, wall_hz, 12, 3.5, .035, noise[900:]), 450)
        thud = high_pass(struck(BOTTOM_MODES, bottom_hz, 13, 4.0, 0.07, noise[800:]), 120)
        add(out, s, gain_of(db) * peaked(signal.fftconvolve(wall, press)))
        add(out, s, gain_of(db + thud_db) * peaked(signal.fftconvolve(thud, np.hanning(90))))
        add(out, s, gain_of(db + thud_db + JOLT_RE_THUD_DB) * jolt)
        add(out, s, gain_of(db + claw_db) * peaked(np.convolve(claw, press * np.exp(-t / 0.005))))
        add(out, s, gain_of(db + tick_db) * tick(noise, 0.01 + 10.6 * contact_s))
    return out


def scene():
    """Sums all sources into one channel."""
    background = far_sea() + wind() + engine() + hiss()
    shore = waves() + gulps()
    crab = snaps() + scrabble() + knocks()
    return (background + shore + crab)[None]


def record(dry):
    """Hard clip at full scale, then a linear-phase low-pass."""
    clipped = np.clip(dry, -1, 1)
    low_pass = signal.firwin(511, EDGE_HZ, window=("kaiser", 9), fs=SR)
    return signal.oaconvolve(clipped, low_pass[None], "same")


dry = scene()
out = record(dry)
to_wav(out)
```